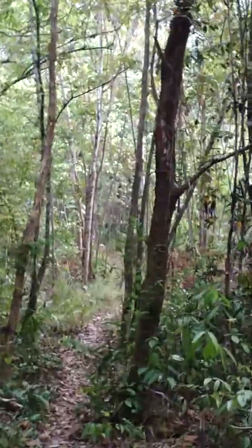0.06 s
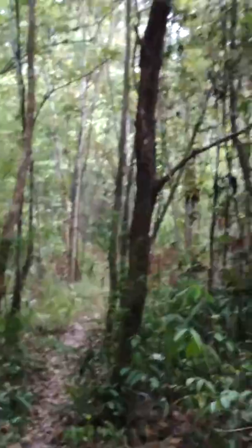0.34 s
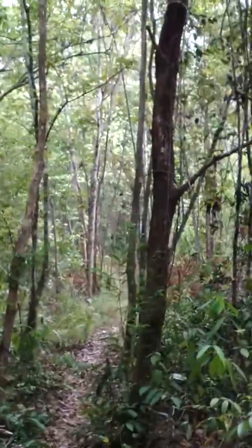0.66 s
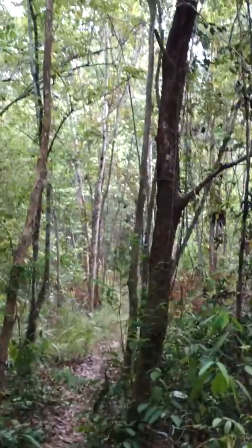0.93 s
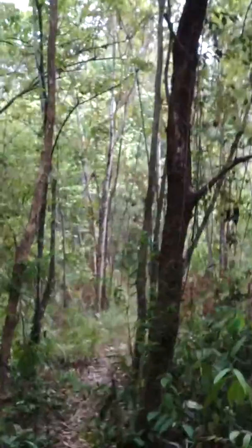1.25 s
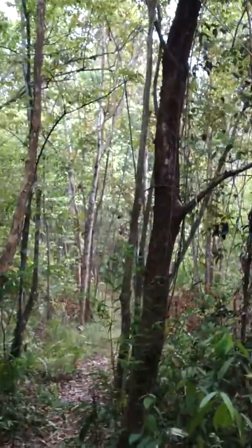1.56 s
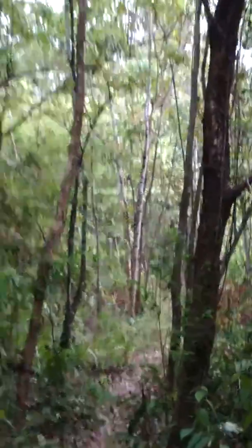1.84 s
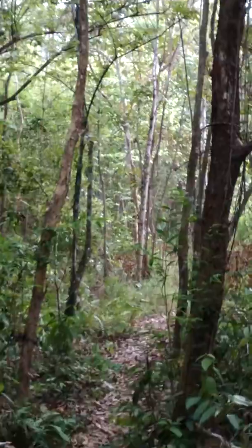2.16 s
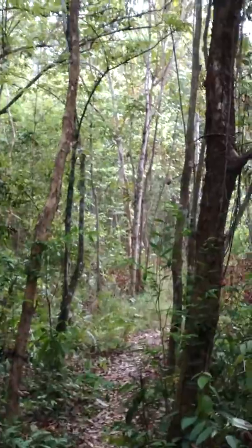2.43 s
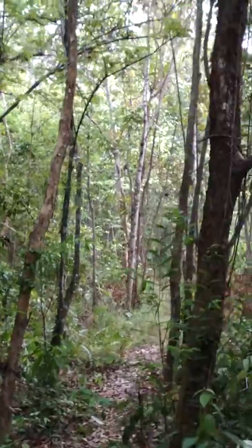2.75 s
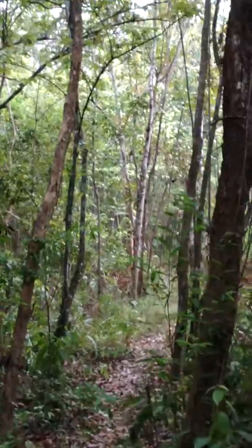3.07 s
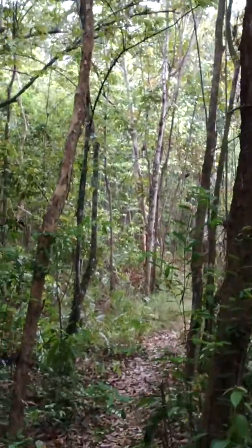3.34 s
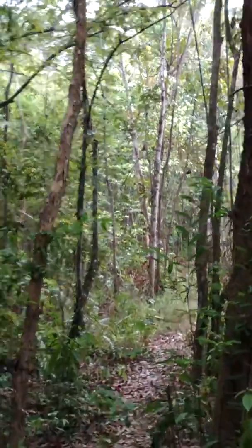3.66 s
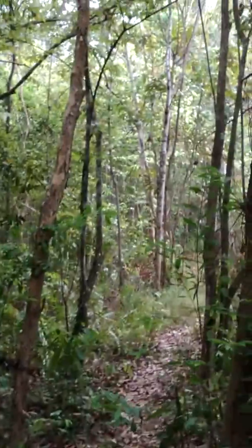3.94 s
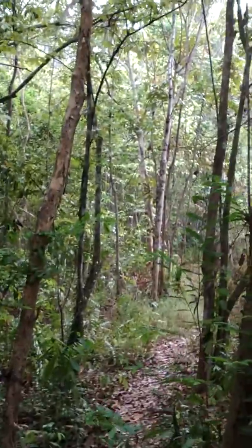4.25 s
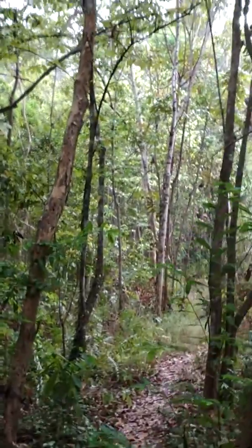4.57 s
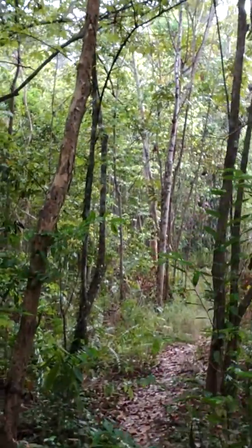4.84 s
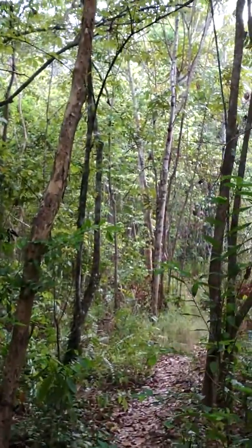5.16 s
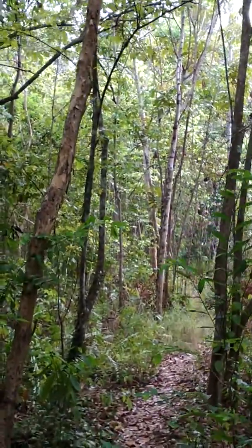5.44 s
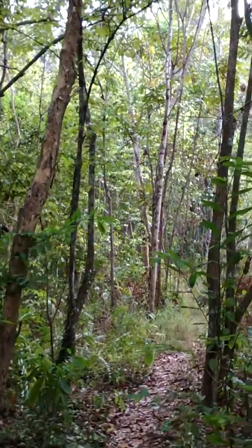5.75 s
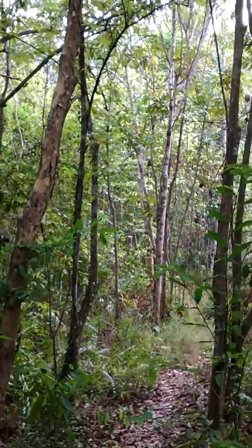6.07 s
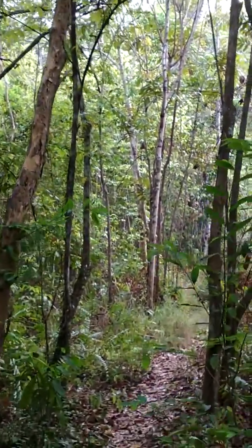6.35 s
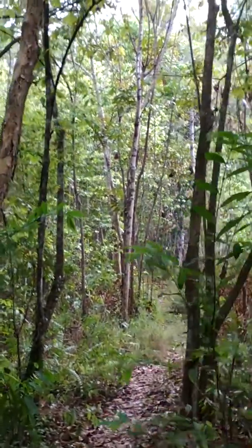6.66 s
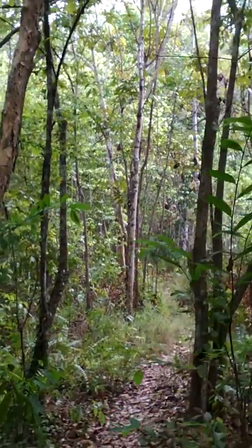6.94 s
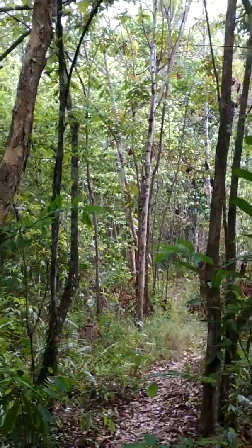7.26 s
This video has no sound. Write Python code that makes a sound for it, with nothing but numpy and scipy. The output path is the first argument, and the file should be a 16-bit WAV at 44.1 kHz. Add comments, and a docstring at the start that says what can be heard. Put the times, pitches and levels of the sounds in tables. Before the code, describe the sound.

Slow footsteps crunch through dry leaves and twigs while small birds rasp and chirp over thin, shrill insect tones.

```python
"""Slow footsteps crunch through dry leaves as someone carries a camera down a forest path.
Each step crushes a heap of brittle leaves into thousands of tiny fractures and snaps stalks and twigs.
Puffs of air rumble on the swaying microphone. Small birds rasp (puffs of hiss) and chirp (rising
whistles) among the trees, while insects hold thin, slowly gliding tones over a soft hush."""
import sys
import numpy as np
from scipy import signal
from scipy.fft import rfft, irfft, next_fast_len
from scipy.io import wavfile
from scipy.ndimage import uniform_filter1d, map_coordinates

SR = 44100
rng = np.random.default_rng(int(sys.argv[2]) if len(sys.argv) > 2 else 0)


def transcribe(signal):
    """Save signal, clipped to [-1, 1], as a 16-bit WAV file at the path in sys.argv[1]."""
    frames = np.atleast_2d(signal).T
    limited = np.clip(frames, -1, 1)
    pcm = np.round(limited * 32767).astype(np.int16)
    wavfile.write(sys.argv[1], SR, pcm)


N = 331191
TIME = np.arange(N) / SR

# the forest's reverb: freq_hz, t60_s
FOREST_DECAY = [(200, 0.22), (1500, 0.19), (6000, 0.58), (12000, 0.077)]


def amp(db):
    """Decibels to gain."""
    return 10 ** (np.asarray(db) / 20)


def unit_rms(x):
    """Scales to an rms of 1."""
    return x / np.sqrt(np.mean(x ** 2) + 1e-20)


def curve_at(points, hz):
    """Reads a curve on a log-frequency axis."""
    freq_hz, value = np.transpose(points)
    return np.interp(np.log(hz + 1), np.log(freq_hz + 1), value)


def eq(x, spectrum):
    """Filters a whole track by a curve of (freq_hz, gain_db) points."""
    size = next_fast_len(N + 4096)
    gain = amp(curve_at(spectrum, np.fft.rfftfreq(size, 1 / SR)))
    return irfft(rfft(x, size) * gain, size)[..., :N]


def noise(spectrum):
    """Wide coloured noise, unrelated left and right."""
    return unit_rms(eq(rng.standard_normal((2, N)), spectrum))


def wander(per_s):
    """A random drift of rms 1."""
    return unit_rms(np.interp(TIME * per_s, np.arange(N), rng.standard_normal(N)))


def pan(left_db):
    """Stereo gains for a level difference, left minus right."""
    return amp(np.array([[1], [-1]]) * left_db / 2)


def add(mix, start_s, sound):
    """Mixes a sound in at its start time."""
    part = mix[max(round(start_s * SR), 0):][:len(sound)]
    part += sound[:len(part)]


def gate(start_s, rise_s, hold_s, release_s):
    """An envelope that rises, holds and dies away."""
    t = TIME - start_s
    return np.clip(t / rise_s, 0, 1) * np.exp(-np.clip((t - rise_s - hold_s) / release_s, 0, 30))


def swell(t, peak_s):
    """An envelope that climbs to 1 at peak_s and falls more slowly."""
    return t / peak_s * np.exp(1 - t / peak_s)


def excite(ring):
    """Noise driving a resonance, at an rms of 1."""
    return unit_rms(signal.fftconvolve(rng.standard_normal(len(ring)), ring)[:len(ring)])


def mottle(x, depth_db, patch_hz, patch_s):
    """Leaves keep shifting, so patches of the spectrum come and go."""
    hz, t, bands = signal.stft(x, SR, nperseg=256)
    grid = np.meshgrid(hz / patch_hz, t / patch_s, indexing="ij")
    patches = map_coordinates(rng.standard_normal(bands.shape), grid, order=1, mode="wrap")
    return signal.istft(bands * amp(depth_db * unit_rms(patches)), SR, nperseg=256)[1][:N]


def scatter(x, decay):
    """Countless small reflections make a stereo tail, each band dying by (freq_hz, t60_s) points."""
    hz, t, bands = signal.stft(rng.standard_normal((2, SR // 2)), SR, nperseg=128)
    tail = signal.istft(bands * amp(-60 * t / curve_at(decay, hz)[:, None]), SR, nperseg=128)[1]
    return signal.fftconvolve(x[None], tail / np.linalg.norm(tail[0]), axes=1)[:, :N]


def trunk_echoes(x, count=9):
    """Nearby trunks throw back a few distinct copies, different ones on each side."""
    out = np.zeros((2, N))
    for channel in out:
        for delay_s in np.linspace(.008, .06, count) + rng.uniform(-.003, .003, count):
            add(channel, delay_s, x * np.exp(-delay_s / .05))
    return out


def forest_hush():
    """A quiet, uneven bed of noise from shifting foliage."""
    # colour of the hush: freq_hz, gain_db
    hush_eq = [(20, 26.5), (100, 17), (170, 6.5), (500, 3.5), (1000, -1), (2900, -.5), (3700, -4.5),
               (4600, -3.5), (4850, 7), (5250, 9), (5650, 1), (6300, 4), (7200, 1), (9000, 7), (11500, 8),
               (12600, 4), (13200, -8), (16000, -9)]
    hush = [mottle(channel, depth_db=2.2, patch_hz=350, patch_s=.13) for channel in noise(hush_eq)]
    return amp(-62.5) * np.array(hush)


def air_puffs():
    """Air pushes on the swaying microphone in short, low rumbles."""
    # puffs of air: centre_s, half_length_s, level_db, left_db
    puffs = [(0.223, 0.024, -62, -31), (0.443, 0.041, -38, 19.5), (0.552, 0.081, -39.5, -7.5),
             (1.1, 0.038, -55.5, 23.5), (1.269, 0.062, -42.5, -13), (2.027, 0.044, -41, 4.5),
             (0.82, 0.02, -48.5, -10), (1.584, 0.068, -57, -14), (2.412, 0.021, -47, 2),
             (2.878, 0.095, -54.5, -23.5), (3.766, 0.039, -44, 4), (4.007, 0.1, -49, 13.5),
             (4.705, 0.017, -64.5, -31), (4.962, 0.076, -62.5, 23), (5.81, 0.038, -61, -10),
             (6.14, 0.044, -61, 4), (6.745, 0.026, -52, -21), (6.968, 0.038, -50.5, 20),
             (7.185, 0.068, -57, 10)]
    # colour of the rumble: freq_hz, gain_db
    rumble_eq = [(10, 7), (27, 1), (40, 7), (55, -3), (80, -5), (115, -6.5), (160, -24), (400, -31.5),
                 (1500, -67)]
    power = sum((amp(db) * pan(left_db)) ** 2 / (1 + ((TIME - centre_s) / half_s) ** 2 / 2) ** 3
                for centre_s, half_s, db, left_db in puffs)
    return np.sqrt(power) * noise(rumble_eq)


def buzz(hz, width_hz, steady):
    """An insect's tone: a steady part, and a part that flutters differently on each side."""
    carrier = np.exp(2j * np.pi * np.cumsum(hz * np.ones(N)) / SR)
    jitter = rng.standard_normal((2, N)) + 1j * rng.standard_normal((2, N))
    flutter = signal.sosfilt(signal.butter(2, width_hz / 2, fs=SR, output="sos"), jitter)
    return unit_rms(((steady + flutter / np.std(flutter)) * carrier).real)


def bout(start_s, length_s, rise_s=.06):
    """The envelope of a distant insect that starts up, holds its note and stops."""
    return gate(start_s, rise_s, length_s - rise_s, release_s=.1)


def insect_drone(pitch_hz=3029, rest_db=-95):
    """A hoarse, wavering insect to the left swells and sinks but never quite stops."""
    # swells of the drone: start_s, length_s, level_db
    swells = [(-.05, 0.17, -75.5), (0.52, 0.32, -76), (1.06, 0.23, -72), (2.0, .25, -88), (2.36, 0.12, -76),
              (3.11, 0.14, -74.5), (3.43, 0.06, -81), (4.75, 0.9, -76), (5.42, .15, -78), (5.66, .48, -80),
              (6.65, .5, -88), (7.22, 0.2, -81)]
    level = amp(rest_db) + sum(amp(db) * bout(start_s, length_s) for start_s, length_s, db in swells)
    tone = buzz(pitch_hz, width_hz=45, steady=2.2)
    hoarseness = amp(-10) * buzz(pitch_hz + 60, width_hz=190, steady=0)
    return amp(4) * level * (tone + hoarseness) * pan(19)


def insect_chorus():
    """Distant insects blend into faint, unbroken bands of buzz."""
    # bands of the chorus: pitch_hz, width_hz, level_db, steady_to_flutter_ratio
    bands = [(5188, 45, -72, .6), (5260, 110, -76, 0), (6270, 140, -76, 0), (15120, 90, -81, 0)]
    return sum(amp(db) * buzz(hz, width_hz, steady) for hz, width_hz, db, steady in bands)


def far_insects():
    """Farther insects hold thin notes, each a straight glide."""
    # held notes: start_s, length_s, start_hz, glide_hz_per_s, level_db
    notes = [(0, 1.3, 12460, -30, -66), (1.3, .7, 12420, 290, -63), (2.5, 1.6, 12480, 15, -66),
             (4.3, 3.2, 12615, -94, -63.5), (0, 1.5, 11990, -35, -64), (1.5, 1.3, 11945, -90, -56),
             (3.9, 1.4, 11730, 75, -65), (5.9, 1.6, 11745, 72, -65), (0, .3, 5510, 160, -63)]
    out = np.zeros((2, N))
    for start_s, length_s, hz, glide, db in notes:
        tone = buzz(hz + glide * (TIME - start_s), width_hz=100, steady=.6)
        out += amp(db) * bout(start_s, length_s) * tone
    return out


def near_insect(stir, pitch_hz=12066, glide_hz_per_s=58, rise_s=.11, accent_s=.053):
    """A shrill tone creeps up in pitch through each phrase and swells unevenly with the leaf crackle."""
    # shrill phrases: start_s, length_s, level_db, opening_accent_db
    phrases = [(-.1, 1.6, -52, -33), (2.33, 1.63, -52.5, -45), (4.824, 1.46, -52, -12),
               (7.088, 1.5, -54, 15.5)]
    out = np.zeros((2, N))
    for start_s, length_s, db, accent_db in phrases:
        t = TIME - start_s
        tone = buzz(pitch_hz + glide_hz_per_s * t, width_hz=45, steady=1)
        accent = amp(accent_db) * np.exp(-((t - rise_s) / accent_s) ** 2)
        surge = amp(-3.5 + 7.15 * wander(60)) * stir
        level = amp(db) * (1 + accent) * pan(-3) + surge
        out += gate(start_s, rise_s, length_s - rise_s, release_s=.076) * level * tone
    return out


def bird_notes():
    """Yields start_s, rasp_db, edge_db, whistle_db for each note; a run ends softer and duller."""
    # runs of evenly spaced notes, the edge being the sharp top of the rasp:
    # start_s, note_count, spacing_s, rasp_db, edge_db, edge_db_per_note, whistle_db
    runs = [(1.425, 4, 0.087, -37.5, -3.5, -1, -52), (1.945, 2, 0.055, -40.5, 3, 9, -64),
            (2.228, 5, 0.11, -39.5, 2.5, 2, -68), (3.304, 3, 0.11, -44.5, -6.5, 16.5, -58),
            (4.378, 3, .103, -39, 2.5, -6, -45.5), (5.112, 3, .104, -38.5, -2.5, -4, -44.5),
            (6.487, 4, 0.097, -44, -7, -9, -51), (7.146, 3, 0.105, -38, 5, -1.5, -43.5)]
    for start_s, count, spacing_s, rasp_db, edge_db, edge_db_per_note, whistle_db in runs:
        for k in range(round(count)):
            last = k == round(count) - 1
            note_edge_db = edge_db + k * edge_db_per_note - 20.5 * last
            yield start_s + k * spacing_s, rasp_db - 1.5 * last, note_edge_db, whistle_db - 14 * last


def bird_rasps(rise_s=.031, echo_db=-8, echo_s=.15, edge_echo_s=.02):
    """Toneless bird notes: quick puffs of hiss that linger among the trees, the top fading first."""
    # colour of the rasp's body: freq_hz, gain_db
    body_eq = [(3000, -100), (4500, -7), (5200, 7), (6200, 15.5), (6900, 9.5), (8300, 13.5), (9400, 12.5),
               (9750, -5), (12000, -37), (13000, -48)]
    # colour of its sharp upper edge: freq_hz, gain_db
    edge_eq = [(7000, -71), (9300, 2.5), (9900, 0.5), (11800, 9.5), (12400, 10), (12900, -35), (16000, -38)]
    # where the birds sit as the walker passes: time_s, left_db
    positions = [(1.5, -3), (4.5, -0.5), (5.3, -3), (7.3, -3)]
    body_power, edge_power = np.zeros((2, N))
    t = np.arange(SR // 2) / SR
    puff = swell(t, rise_s) ** 2
    echo = amp(echo_db) ** 2 * (1 - np.exp(-t / rise_s))
    for start_s, db, edge_db, _ in bird_notes():
        add(body_power, start_s, amp(db) ** 2 * (puff + echo * np.exp(-t / echo_s)))
        add(edge_power, start_s, amp(db + edge_db) ** 2 * (puff + echo * np.exp(-t / edge_echo_s)))
    body = amp(-9) * np.sqrt(body_power) * noise(body_eq)
    edge = amp(-12.5) * np.sqrt(edge_power) * noise(edge_eq) * pan(-5)
    flicker = amp(.24 * wander(210))
    return (body + edge) * flicker * pan(np.interp(TIME, *np.transpose(positions)))


def bird_chirps(bend=2.3):
    """Slightly hoarse whistles shoot up and level off, repeated by trunks and blurred by foliage."""
    # full chirps, most closing a run: start_s, length_s, start_hz, top_hz, level_db, direct_db
    chirps = [(0.599, 0.037, 5500, 6290, -35.5, -3), (1.74, 0.052, 5330, 6575, -37.5, -12),
              (2.013, 0.03, 5610, 6660, -39.5, -2), (2.52, 0.045, 5080, 5690, -43, -12),
              (2.806, 0.031, 5320, 6240, -39, -8), (2.972, 0.06, 5350, 5650, -39, -14),
              (3.588, 0.026, 5400, 5780, -40, -20), (4.628, 0.047, 5100, 6700, -39, -5),
              (5.349, 0.04, 4900, 6750, -36.5, -1), (7.382, 0.036, 4750, 6750, -35.5, 1.5)]
    # a tiny whistle inside each rasp, same columns
    upsweeps = [(start_s + .015, .016, 4700, 6400, db, -3) for start_s, _, _, db in bird_notes()]
    song, near = np.zeros((2, N))
    for start_s, length_s, start_hz, top_hz, db, direct_db in chirps + upsweeps:
        progress = np.linspace(0, 1, max(round(length_s * SR), 8))
        hz = start_hz + (top_hz - start_hz) * np.expm1(-bend * progress) / np.expm1(-bend)
        hz += 45 * unit_rms(uniform_filter1d(rng.standard_normal(len(hz)), size=60))  # hoarseness
        whistle = amp(db) * signal.windows.tukey(len(hz), .3) * np.sin(2 * np.pi * np.cumsum(hz) / SR)
        add(song, start_s, whistle)
        add(near, start_s, amp(direct_db) * whistle)
    direct = np.array([np.pad(near, (15, 0))[:N], near])  # reaches the right side first
    echoes = amp(-6) * trunk_echoes(song)
    foliage = amp(-2.5) * scatter(song, [(4000, .13), (8000, .21)])
    return direct + echoes + foliage + amp(-6.5) * scatter(song, FOREST_DECAY)


def foot_pressure(release_s=.043, settle_s=.15, settle_db=-21.5):
    """How hard the feet work packed litter, loose leaves and flakes (gains), and the leaves' pan (dB)."""
    # heel, sole and toe pressing into the leaves, a few presses a step:
    # start_s, rise_s, hold_s, crunch_db, crackle_db, flakes_over_crackle_db, left_db
    presses = [ (0, 0.0051, 0.034, -74.5, -67.5, 3, 10), (0.267, 0.048, 0.024, -52.5, -50, 6, 16.5),
               (0.358, 0.01, 0.04, -71, -46, 2.5, -3.5), (0.433, 0.071, 0.039, -50, -43.5, -1, 1.5),
               (0.541, 0.053, 0.051, -52, -39.5, 3.5, -2.5), (0.754, 0.0055, 0.0085, -58.5, -48, -6, -6),
               (1.061, 0.024, 0.011, -43, -41, 0.5, 9), (1.112, 0.015, 0.13, -51, -44, 2.5, 5),
               (1.269, 0.014, 0.16, -62, -50, -2, 4.5), (1.765, 0.03, 0.0071, -58.5, -60, -2, 4),
               (1.841, 0.064, 0.012, -51.5, -44, -6.5, 2.5), (1.97, 0.039, .2, -60.5, -56.5, -22, 10),
               (2.746, 0.042, 0.024, -51, -52, 7.5, 6), (2.797, 0.039, 0.12, -51.5, -43, -7.5, -1),
               (2.999, 0.022, 0.02, -54.5, -46.5, -5, 3.5), (3.145, 0.026, 0.01, -72, -54.5, -14, -10),
               (3.601, 0.031, 0.036, -57, -53, -17, -2), (3.66, 0.015, 0.057, -50, -52, 6, 8),
               (3.777, 0.038, 0.042, -60.5, -55.5, 8.5, 2), (3.911, .025, 0.037, -67, -80, 2, -15),
               (4.225, 0.0085, 0.0084, -86, -85, -2, 0), (4.568, 0.032, 0.012, -63, -91, 0, -4),
               (4.638, 0.051, 0.073, -66.5, -71.5, -4, 22.5), (5.448, 0.068, 0.023, -56, -55.5, -26, 9.5),
               (5.638, 0.02, 0.2, -67, -76.5, -7, 31), (5.696, 0.025, 0.089, -76, -62.5, -15, 14),
               (5.999, 0.046, 0.0077, -61.5, -73, 0, -7), (6.569, 0.073, 0.02, -57.5, -58, -3, 8.5),
               (6.64, 0.018, 0.12, -66.5, -59, -17, 5), (6.764, 0.035, 0.11, -70.5, -63.5, -2, -2)]
    weight, stir, flakes, lean = np.zeros((4, N)) + 1e-18
    t = np.arange(SR) / SR
    for start_s, rise_s, hold_s, crunch_db, crackle_db, flakes_db, left_db in presses:
        # once the weight is off, the crushing stops quickly and the leaves settle more slowly
        lifted_s = np.maximum(t - rise_s - hold_s, 0)
        fall = np.maximum(np.exp(-lifted_s / release_s), amp(settle_db) * np.exp(-lifted_s / settle_s))
        press = np.minimum(t / rise_s, 1) * fall
        crackle_power = (amp(crackle_db) * press) ** 2
        add(weight, start_s, (amp(crunch_db) * press) ** 2)
        add(stir, start_s, crackle_power)
        add(flakes, start_s, crackle_power * amp(flakes_db) ** 2)
        add(lean, start_s, crackle_power * left_db)
    return np.sqrt(weight), np.sqrt(stir), np.sqrt(flakes), lean / stir


def hollow_knock():
    """One dull, hollow knock that stops almost at once."""
    # its tones: pitch_hz, level_db
    tones = [(203, -47.5), (328, -40), (640, -55)]
    envelope = gate(start_s=2.397, rise_s=.005, hold_s=.016, release_s=.004)
    return envelope * sum(amp(db) * np.sin(2 * np.pi * hz * TIME) for hz, db in tones)


def sole_knocks(damping=.43):
    """A sole rubs briefly over something hard, which answers with one broad, dull resonance."""
    # knocks and scuffs on earth and roots: start_s, level_db, pitch_hz, swell_s
    knocks = [(0.558, -37, 540, 0.0056), (.754, -35.5, 577, 0.0037), (0.824, -37.5, 355, 0.0048),
              (1.22, -30.5, 1210, 0.0036), (1.37, -41, 318, 0.0071), (1.44, -43, 435, 0.0051),
              (1.503, -51.5, 724, 0.01), (1.589, -50, 855, 0.0061), (1.894, -37.5, 1370, 0.0055),
              (2.191, -39.5, 332, 0.0036), (2.398, -41, 710, 0.0089), (3.036, -41, 304, 0.0078),
              (3.131, -54.5, 610, 0.0083), (3.178, -55, 530, 0.018), (3.389, -50, 740, 0.0026),
              (3.675, -36.5, 1350, 0.0077), (3.69, -50.5, 366, 0.035), (3.942, -54, 260, 0.015),
              (5.019, -50, 870, 0.022), (6.0, -57.5, 303, 0.066), (6.242, -56.5, 650, 0.012),
              (7.093, -56, 990, 0.023)]
    out, t = np.zeros(N), np.arange(SR // 4) / SR
    for start_s, db, hz, swell_s in knocks:
        ring = np.exp(-np.pi * damping * hz * t) * np.cos(2 * np.pi * hz * t)
        add(out, start_s, amp(db) * excite(ring) * swell(t, swell_s))
    return eq(out, [(60, -27), (150, -5), (300, -11), (900, -1), (2500, -2), (5000, 5.5)])


def snaps(breaks, rise_s, splinter_db, splinter_s):
    """A stiff piece breaks: one heavily damped swing, then a short spray of splinters."""
    out, t = np.zeros(N), np.arange(2048) / SR
    for start_s, db, hz in breaks:
        swing = swell(t, rise_s) * np.sin(2 * np.pi * hz * t)
        splinters = amp(splinter_db) * excite(swing) * np.exp(-t / splinter_s)
        add(out, start_s, amp(db) * (swing + splinters))
    return out


def leaf_cracks():
    """Dry leaves split with sharp, bright ticks."""
    # single cracks: start_s, level_db, pitch_hz
    cracks = [(.3162, -23, 10000), (.3627, -22, 11000), (.4057, -24, 11000), (.5036, -22, 9500),
              (.5144, -24, 9800), (.6135, -21, 7500), (.6267, -20, 9000), (.758, -27, 7000),
              (.7962, -25, 9400), (.7985, -26, 9400), (.9392, -24, 7500), (.9486, -32, 10500),
              (1.0795, -23, 9500), (1.09, -14.5, 7000), (1.1047, -20, 9400), (1.1468, -19, 11000),
              (1.1557, -20, 9400), (1.1616, -22, 8600), (1.2061, -21, 9900), (1.2133, -16.5, 10000),
              (1.2235, -23, 6500), (1.238, -23, 9700), (1.2812, -25, 6000), (1.4305, -20, 8000),
              (1.4378, -24, 10000), (2.1294, -26, 7000), (2.1871, -35, 8000), (2.2032, -37, 8500),
              (2.806, -19, 9000), (2.8857, -22, 8500), (2.9269, -23, 10000), (3.0268, -11.5, 8000),
              (3.778, -29, 6000), (3.8255, -17.5, 8500), (3.8672, -28, 11400), (4.0953, -28, 12000),
              (4.6253, -20, 12000), (5.774, -34, 8400), (5.8078, -23, 10500), (5.944, -34, 10500),
              (6.7254, -28, 8500), (6.8768, -24.5, 9500), (6.9633, -33, 10000)]
    ticks = snaps(cracks, rise_s=.00004, splinter_db=-11, splinter_s=.0016)
    return eq(ticks, [(400, -16), (1500, -4), (2600, -4), (3600, -10), (5200, 1), (8000, 3.5)])


def twig_snaps():
    """Twigs break underfoot with a woody midrange click."""
    # breaking twigs: start_s, level_db, pitch_hz
    twigs = [(.2985, -35, 1900), (.5037, -26, 2050), (.5604, -28, 1300), (.7576, -31, 1850),
             (.939, -43, 2500), (1.0742, -30, 2200), (1.0781, -29, 2200), (1.0896, -26, 1900),
             (1.1339, -29, 1850), (1.1613, -26, 1650), (1.1991, -34, 2000), (1.2132, -30, 1600),
             (1.2251, -32, 2200), (1.2808, -36, 2400), (1.4376, -36, 2000), (1.785, -34, 1900),
             (1.8993, -31, 1800), (1.9216, -34, 2100), (1.958, -38, 1800), (2.1652, -18, 1900),
             (2.2767, -45, 1900), (2.8057, -30, 2150), (2.8492, -35, 1900), (2.8854, -27, 1950),
             (2.891, -27, 1600), (2.9264, -31, 2000), (2.9785, -34, 2100), (3.0203, -33, 2000),
             (3.0265, -31, 1700), (3.6745, -33, 1450), (3.6857, -34, 1700), (3.7195, -38, 2400),
             (3.7778, -34, 2300), (3.8264, -28, 1950), (4.6947, -37.5, 1650), (4.7718, -40, 1950),
             (5.5161, -37, 1970), (5.7128, -39, 2100), (5.8488, -44, 2100), (5.8732, -44, 2100),
             (6.0628, -38, 1800), (6.6201, -39, 1900), (6.6627, -35, 2000), (6.7254, -22.5, 1950),
             (6.8222, -37, 2500), (6.963, -46, 2000)]
    return amp(.5) * snaps(twigs, rise_s=.00036, splinter_db=-20, splinter_s=.004)


def fractures(per_s, spread_db, clump_db, ring_s, leaf_count=200):
    """Tiny breaks of uneven size come in clumps; each rings one of a set of leaves for an instant."""
    size = amp(spread_db * np.minimum(rng.exponential(1, N), 4) + clump_db * wander(170))
    size *= rng.choice([-1, 1], N) * (rng.random(N) < per_s / SR)
    leaf, t = rng.integers(0, leaf_count, N), np.arange(128) / SR
    rings = rng.standard_normal((leaf_count, len(t))) * np.exp(-t / ring_s)
    onsets = np.flatnonzero(size)
    samples = onsets[:, None] + np.arange(len(t))
    grains = size[onsets, None] * rings[leaf[onsets]]
    return np.bincount(samples.ravel(), grains.ravel(), N)[:N]


def leaf_crackle(stir, flakes):
    """Loose leaves crackle around the foot, and their finest flakes fizz on top."""
    # colour of the loose leaves: freq_hz, gain_db
    crackle_eq = [(1500, -41), (3600, -15), (4400, -1.5), (5300, 6.5), (6300, 6), (7300, 3.5), (9000, 5),
                  (11000, 6), (12300, 4.5), (13000, -34), (15800, -54)]
    # colour of the flakes: freq_hz, gain_db
    fizz_eq = [(6000, -22.5), (9500, -24), (12300, -1.5), (13200, -5), (15800, -14.5)]
    coarse = fractures(per_s=5200, spread_db=3.3, clump_db=1.8, ring_s=.0003)
    fine = fractures(per_s=4000, spread_db=4.4, clump_db=1.8, ring_s=.0002)
    shatter = flakes * (stir / amp(-39.5)) ** .31  # harder steps shatter more flakes
    return amp(7.5) * (stir * unit_rms(eq(coarse, crackle_eq)) + shatter * unit_rms(eq(fine, fizz_eq)))


def litter_crunch(weight):
    """The sole breaks the packed litter beneath it; under a light foot single stiff leaves stand out."""
    # colour of the packed litter: freq_hz, gain_db
    crunch_eq = [(100, -25), (220, -20), (450, -9.5), (850, -5), (1100, 1), (1350, 6), (1650, 5),
                 (2150, 3.5), (2800, 0), (3600, -6), (5500, -24), (8000, -49), (15000, -45)]
    breaks = fractures(per_s=1200, spread_db=3.4, clump_db=2.6, ring_s=.0005)
    breaks = mottle(breaks, depth_db=2.8, patch_hz=420, patch_s=.04)
    crunch = amp(9) * weight * unit_rms(eq(breaks, crunch_eq))
    crinkles = fractures(per_s=160, spread_db=3.5, clump_db=2, ring_s=.0012)
    crinkle_gain = amp(-56) * (weight / amp(-55)) ** .69  # grows more slowly than the weight
    return crunch + crinkle_gain * unit_rms(eq(crinkles, crunch_eq))


def footsteps(weight, stir, flakes, lean_db):
    """Foot sounds reach the right side later and shaded; the litter and shrubs scatter them."""
    # shading on the right side: freq_hz, gain_db
    shadow_eq = [(100, 0), (350, -1.5), (800, -4.5), (1400, -9), (3000, -8.5), (7000, -9), (15000, -9)]
    sole = litter_crunch(weight) + sole_knocks() + hollow_knock() + leaf_cracks() + twig_snaps()
    to_left, to_right = pan(lean_db)
    # leaves break all around the foot, so each side gets its own crackle
    left = sole + to_left * leaf_crackle(stir, flakes)
    far_side = amp(-5) * litter_crunch(weight) + to_right * leaf_crackle(stir, flakes)
    right = eq(np.pad(sole, (19, 0))[:N] + far_side, shadow_eq)
    ground = scatter(left, [(300, .04), (10000, .025)])
    ground = eq(ground, [(300, -15), (1500, -13.5), (6000, -12), (12000, -13)])
    return np.array([left, right]) + ground + amp(-19) * scatter(left, FOREST_DECAY)


def scene():
    """Steps in front; birds, insects and air around them."""
    weight, stir, flakes, lean_db = foot_pressure()
    steps = footsteps(weight, stir, flakes, lean_db)
    birds = bird_rasps() + bird_chirps()
    insects = insect_drone() + insect_chorus() + near_insect(stir) + far_insects()
    return steps + birds + insects + forest_hush() + air_puffs()


def record(dry):
    """A steep low-pass trims the very top of the treble."""
    lowpass = signal.firwin(511, cutoff=15950, window=("kaiser", 9), fs=SR)
    return signal.oaconvolve(dry, lowpass[None], "same")


dry = scene()
out = record(dry)
transcribe(out)
```